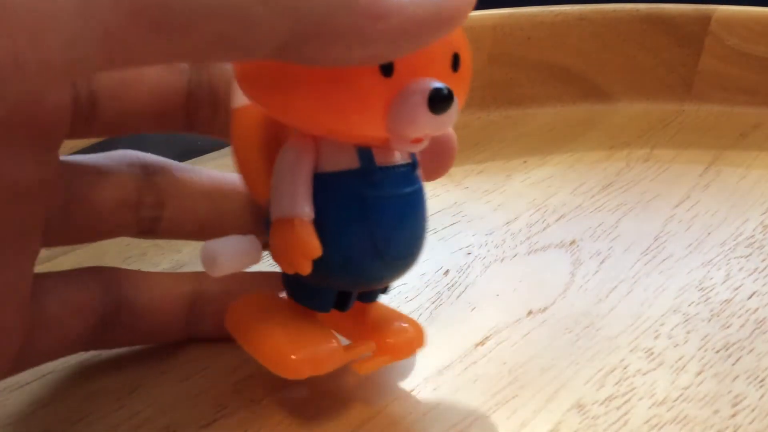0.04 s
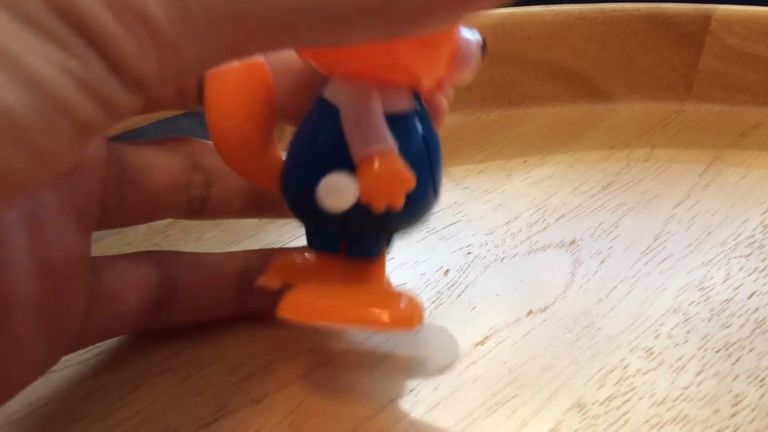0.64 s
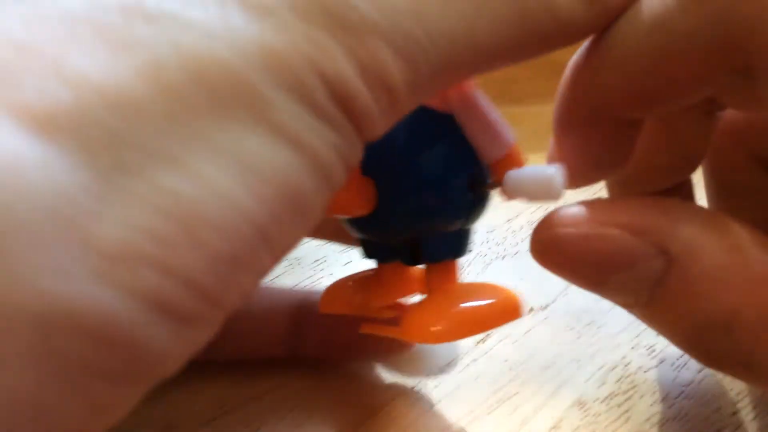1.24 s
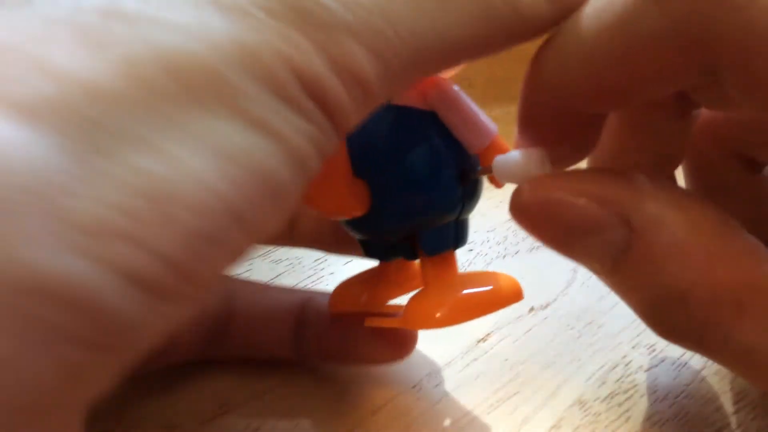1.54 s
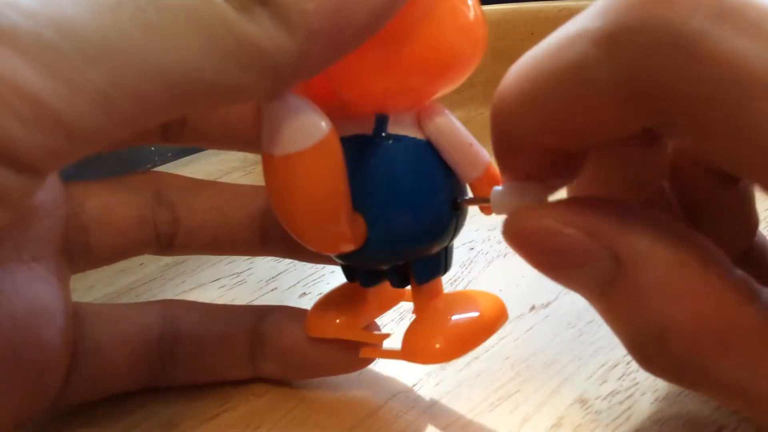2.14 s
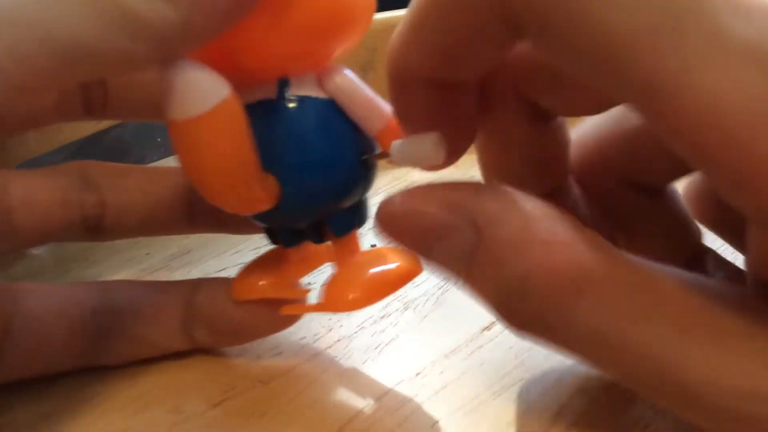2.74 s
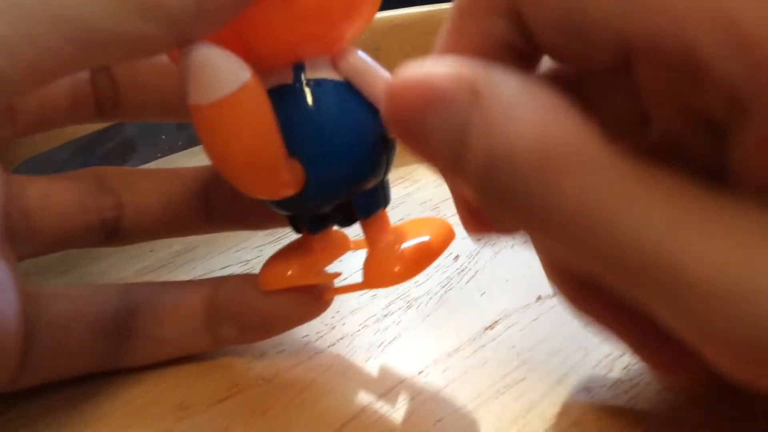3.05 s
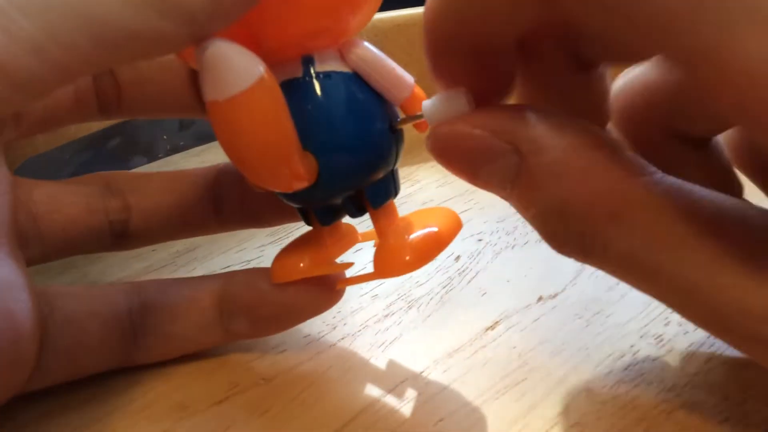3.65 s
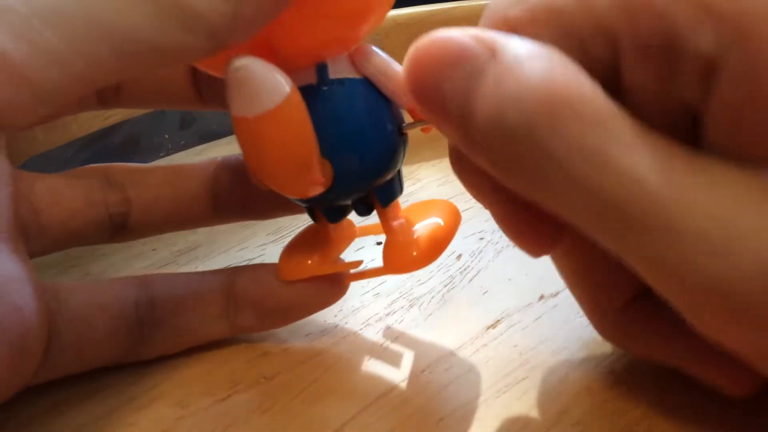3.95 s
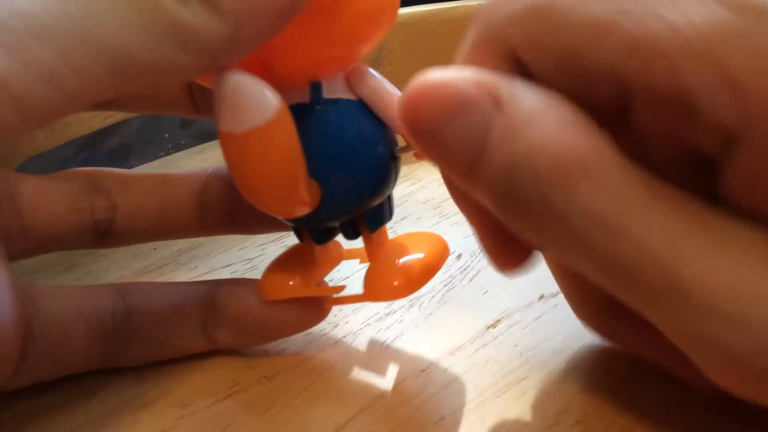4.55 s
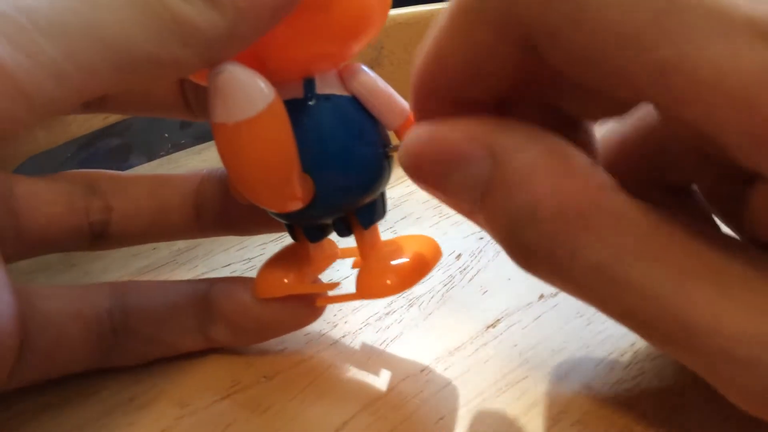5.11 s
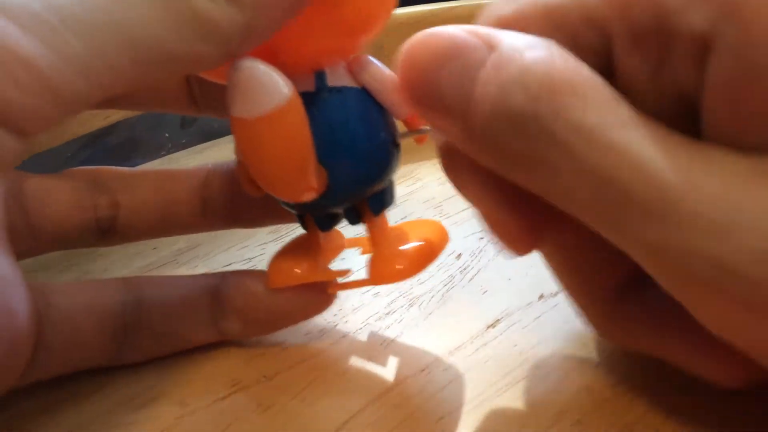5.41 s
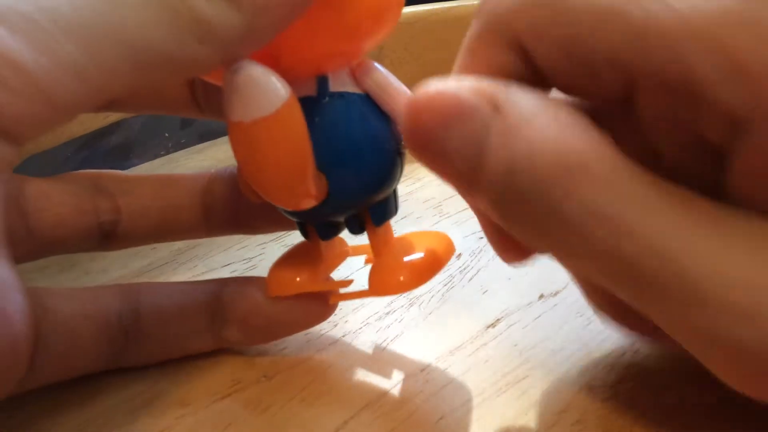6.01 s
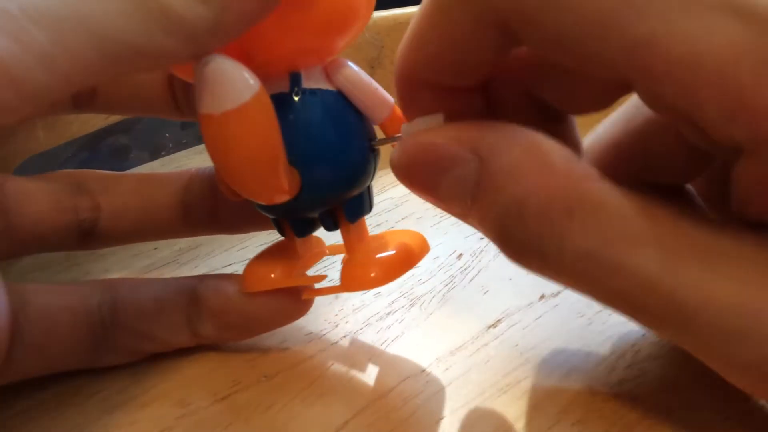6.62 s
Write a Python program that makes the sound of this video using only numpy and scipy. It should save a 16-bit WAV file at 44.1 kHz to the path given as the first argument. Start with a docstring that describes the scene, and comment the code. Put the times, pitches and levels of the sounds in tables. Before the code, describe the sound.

Close rattling whir of a wind-up toy dying away, followed by uneven twists of its clicking key and soft handling bumps.

```python
"""A small plastic clockwork toy whirs close by, over a wooden tray, its escapement rattling the case. A hand
cups it, shifting the colour; the whir runs down in just over a second, then gives two short spurts. From 2.2 s
fingers wind the key in seven uneven twists: a pawl snaps over the ratchet teeth and rings the hollow shell.
Around the twists the hands bump and rub the toy, loose parts tick and the pawl settles. A small, quiet room
answers the clicks."""
import sys
import numpy as np
from scipy import signal
from scipy.fft import rfft, irfft
from scipy.io import wavfile
from scipy.ndimage import uniform_filter1d, map_coordinates

SR = 44100
rng = np.random.default_rng(int(sys.argv[2]) if len(sys.argv) > 2 else 0)


def transcribe(signal):
    """Save signal, clipped to [-1, 1], as a 16-bit WAV file at the path in sys.argv[1]."""
    frames = np.atleast_2d(signal).T
    limited = np.clip(frames, -1, 1)
    pcm = np.round(limited * 32767).astype(np.int16)
    wavfile.write(sys.argv[1], SR, pcm)


N = 302967
TIME = np.arange(N) / SR

# resonances of the hollow shell: f/Hz, width/Hz, level/dB at colour 0 (brighter), level/dB at colour 1
SHELL_MODES = [(864, 590, -25, -26.5), (1400, 230, -24.5, -24.5), (2543, 330, -13.5, -15),
               (3143, 324, -4.5, -8), (3810, 340, -8.5, -9.5), (4430, 600, -16, -15.5),
               (5070, 170, -10.5, -14), (5640, 350, -10.5, -11.5), (6900, 410, -5, 2.5),
               (7430, 150, -2.5, -6.5), (8170, 900, -1, -1.5), (9540, 500, 2, -7), (10500, 150, -4, -10.5),
               (11130, 1100, -4, -14), (13240, 1200, -11, -12), (13850, 290, -15.5, -22.5),
               (16300, 490, -5.5, -20)]
# one curve for each twist of the key: t/s, teeth passed, snap level/dB
KEY_TWISTS = [
    [(2.2387, 0, -27), (2.26, 1, -25), (2.3032, 4, -22), (2.3817, 7, -25), (2.441, 11, -21),
     (2.4746, 13, -20), (2.5027, 14, -20.5), (2.5365, 15, -20.5)],
    [(2.95, 0, -23), (3.0121, 4, -18), (3.0377, 6, -20), (3.0558, 7, -18), (3.0888, 8, -21),
     (3.1192, 9, -23), (3.1473, 11, -18), (3.1769, 13, -18), (3.2294, 16, -21), (3.2564, 17, -24)],
    [(3.8056, 0, -30), (3.8189, 1, -23), (3.874, 7, -23), (3.9139, 9, -22.5), (3.9339, 10, -26),
     (3.9868, 14, -25), (4.005, 15, -24.5), (4.035, 16, -24.5)],
    [(4.4915, 0, -26), (4.5069, 1, -23), (4.5309, 4, -22), (4.6259, 11, -22), (4.678, 13, -18.5),
     (4.7113, 14, -19)],
    [(5.1606, 0, -21), (5.1775, 1, -23), (5.1895, 2, -22), (5.238, 5, -22), (5.251, 6, -24),
     (5.2705, 7, -19.5), (5.3333, 11, -22), (5.3704, 13, -23), (5.3918, 14, -21)],
    [(5.944, 0, -19), (5.9885, 5, -23), (6.0071, 6, -23), (6.066, 8, -21), (6.1341, 10, -23),
     (6.1512, 11, -23), (6.1742, 12, -22), (6.2333, 13, -23.5)],
    [(6.7305, 0, -23), (6.7604, 2, -14), (6.7898, 5, -20), (6.8064, 6, -19), (6.8353, 7, -21)],
]


def amp(db):
    """Decibels to gain."""
    return 10 ** (np.asarray(db) / 20)


def unit(x):
    """Scales to rms 1."""
    return x / np.sqrt(np.mean(x ** 2) + 1e-20)


def envelope(rows):
    """Gain curve through rows of t/s, level/dB; silent outside them."""
    return amp(np.interp(TIME, *np.transpose(rows), left=-np.inf, right=-np.inf))


def at_hz(points, hz):
    """Reads rows of f/Hz, value on a log-frequency axis."""
    f, value = np.transpose(points)
    return np.interp(np.log(hz + 1), np.log(f + 1), value)


def add(mix, s, sound):
    """Lays a sound into the mix at time s."""
    part = mix[max(round(s * SR), 0):][:len(sound)]
    part += sound[:len(part)]


def coloured(x, eq):
    """Shapes x with an EQ curve of f/Hz, level/dB, at rms 1."""
    gain = amp(at_hz(eq, np.fft.rfftfreq(len(x), 1 / SR)))
    return unit(irfft(rfft(x) * gain, len(x)))


def body_ring(modes, blend, tilt_db=0, size=1024):
    """Impulse response of a plastic body, blended between two states; the treble tilts by dB per octave."""
    hz = np.fft.rfftfreq(size, 1 / SR)
    f, width, first_db, second_db = np.transpose(modes)[:, :, None]
    peaks = amp(first_db + blend * (second_db - first_db)) / (1 + ((hz - f) / width) ** 2 * 2)
    gain = np.sqrt((peaks ** 2).sum(0)) * amp(tilt_db * np.log2(np.maximum(hz, 2500) / 8000))
    log_gain = np.log(np.r_[gain, gain[-2:0:-1]] + 1e-5)
    response = np.fft.ifft(np.exp(np.conj(signal.hilbert(log_gain)))).real  # minimum phase
    return response / np.linalg.norm(response)


def contact(t, rise_s, fall_s):
    """Envelope of a rattling contact: it swells and dies within a few milliseconds."""
    attack = np.sin(np.pi / 2 * np.minimum(t / rise_s, 1)) ** 2
    return attack * np.exp(-np.maximum(t - rise_s, 0) / fall_s)


def room_tone(level_db=-72):
    """The quiet room: a low murmur under faint hiss."""
    # spectrum of the room's air: f/Hz, level/dB
    air_eq = [(20, -17.5), (45, -12.5), (80, 3.5), (150, -0.5), (200, -1.5), (270, -8.5), (350, -18),
              (480, -9.5), (800, -18), (1600, -17), (5000, -17), (9000, -14.5), (12000, -23.5),
              (15000, -46.5)]
    return amp(level_db) * coloured(rng.standard_normal(N), air_eq)


def room_reverb(x, wet_db=-17, build_s=0.0025):
    """Adds a diffuse tail that swells after the direct sound and dies sooner in the treble."""
    # decay of the room: f/Hz, t60/s
    decay = [(300, 0.24), (1500, 0.75), (4000, 0.29), (8000, 0.25), (15000, 0.19)]
    hz, t, noise = signal.stft(rng.standard_normal(SR // 2), SR, nperseg=256)
    colour_db = at_hz([(1000, 0.00084), (2800, -5), (5000, 0.0061)], hz)[:, None]
    fade_db = 60 * t / at_hz(decay, hz)[:, None]
    tail = signal.istft(noise * amp(colour_db - fade_db), SR, nperseg=256)[1]
    tail *= 1 - np.exp(-(np.arange(len(tail)) / SR / build_s) ** 2)
    return x + amp(wet_db) * signal.oaconvolve(x, tail / np.linalg.norm(tail))[:N]


def skin_rub(grains_per_s=900, clump_db=4.5, hold_db=-74, turn_db=-63.5, trim_db=-2):
    """Skin sticks and slips in clumps of grains: faint while holding, more on twists and shifts of grip."""
    # fingers slide to a new grip: centre t/s, length/s, level/dB
    slides = [(1.056, 0.45, -64.5), (1.43, 0.33, -63), (2.397, 0.4, -54.5), (2.79, .14, -57.5),
              (3.08, 0.21, -51.5), (3.52, 0.32, -62.5), (4.556, 0.4, -63), (5.122, 0.3, -62),
              (5.818, 0.29, -59.5), (6.55, 0.44, -67)]
    rub_eq = [(30, -11), (90, -6.5), (200, -8.5), (265, -31.5), (335, 3.5), (450, -9.5), (620, -6.5),
              (790, 1.5), (1000, -13.5), (1450, -16.5), (2100, -22.0), (15000, -61.5)]
    grip = unit(uniform_filter1d(rng.standard_normal(N), size=1300))
    grains = (rng.random(N) < grains_per_s / SR) * rng.standard_normal(N)
    rub = coloured(grains * amp(clump_db * np.clip(grip, -2, 2)), rub_eq)
    turning = sum(envelope([(twist[0][0], turn_db), (twist[-1][0], turn_db)]) for twist in KEY_TWISTS)
    sliding = sum(amp(db) * np.cos(np.pi * np.clip((TIME - s) / length, -.5, .5))
                  for s, length, db in slides)
    return rub * np.sqrt(amp(hold_db) ** 2 + turning ** 2 + sliding ** 2) * amp(trim_db)


def fidgets(db, count, spread_db=1.5):
    """Small chance movements of the hands from the first twist on: rows of t/s, level/dB."""
    when, force = rng.random((count, 2)).T
    start = KEY_TWISTS[0][0][0]
    times = start + (np.arange(count) + when) / count * (N / SR - start)
    return list(zip(times, db + spread_db * (2 * force - 1)))


def hand_thuds(swell_s=0.012):
    """The flesh of the hand gives dull thuds, short swells of low noise."""
    # soft pushes of the hands: t/s, level/dB
    pushes = [(.855, -61), (3.293, -62.5), (3.94, -56), (4.839, -65), (5.583, -51.5), (5.95, -62),
              (6.41, -58), (6.755, -59)]
    thud_eq = [(25, -18.5), (80, -6.0), (140, -2.5), (200, -5.5), (300, -24), (900, -32.5)]
    pressure, t = np.zeros(N), np.arange(SR // 5) / SR
    for s, db in list(pushes) + fidgets(db=-62.5, count=18):
        add(pressure, s, amp(db) * t / swell_s * np.exp(1 - t / swell_s))
    return pressure * coloured(rng.standard_normal(N), thud_eq)


def hand_bumps(rise_s=0.0003, hard_db=-28, dulling=.3, low_cut_hz=230):
    """Soft blows ring the low modes, the softer the duller; so small a body radiates little bass."""
    # the hands bump toy and tray: t/s, level/dB
    blows = [(.967, -48), (1.114, -41.5), (1.135, -36), (1.202, -42), (2.61, -44.5), (2.859, -46.5),
             (2.888, -43.5), (3.048, -39), (3.122, -41.5), (3.475, -49.5), (3.584, -45.5), (3.947, -29.5),
             (4.201, -42.5), (4.7819, -29.5), (4.916, -38.5), (5.675, -41), (6.481, -42.5)]
    # modes rung by a bump: f/Hz, level/dB, t60/s
    knock_modes = [(333, -3, 0.072), (480, -6.5, 0.0073), (620, -19, 0.0022), (710, 2, 0.014),
                   (1480, -13, 0.016)]
    out, t = np.zeros(N), np.arange(SR // 5) / SR
    hz, mode_db, t60 = np.transpose(knock_modes)[:, :, None]
    sign = (-1) ** np.arange(len(hz))[:, None]  # neighbouring modes swing in opposite directions
    for s, db in list(blows) + fidgets(db=-55.5, count=12):
        detune, spot = rng.standard_normal((2, len(hz), 1))
        dull_db = dulling * (db - hard_db) * (hz / 1000) ** 2
        fade = amp(mode_db + dull_db + 1.5 * spot - 60 * t / t60)
        modes = sign * fade * np.sin(2 * np.pi * hz * (1 + .015 * detune) * t)
        add(out, s, amp(db) * modes.sum(0) * (1 - np.exp(-t / rise_s)))
    return signal.sosfilt(signal.butter(2, low_cut_hz, "high", fs=SR, output="sos"), out)


def shell_ticks(slack_lead_s=.023, slack_db=-46, slack_decay_s=0.0068):
    """Small ticks ring the shell: loose parts shift, the pawl settles shortly after a twist, and the key takes
    up its slack before each twist."""
    # small ticks in the shell, from loose parts and the pawl settling after a twist: t/s, level/dB, decay/s
    small_ticks = [(1.562, -57, 0.0061), (1.832, -62, 0.027), (1.982, -60, 0.011), (2.645, -34.5, 0.0055),
                   (2.781, -43.5, 0.0027), (2.833, -43.5, 0.0021), (2.909, -53.5, .003),
                   (3.296, -41, 0.0096), (3.368, -47.5, 0.011), (4.356, -50, .003), (4.779, -45, 0.0033),
                   (4.845, -47, 0.0061), (5.055, -43.5, 0.002), (5.498, -27, 0.0018), (6.424, -60.5, 0.014)]
    key_ticks = [(twist[0][0] - slack_lead_s, slack_db, slack_decay_s) for twist in KEY_TWISTS]
    scrapes, t = np.zeros(N), np.arange(SR // 10) / SR
    for s, db, decay_s in list(small_ticks) + key_ticks:
        add(scrapes, s, amp(db) * np.exp(-t / decay_s) * rng.standard_normal(len(t)))
    return signal.oaconvolve(scrapes, body_ring(SHELL_MODES, 0.24, tilt_db=-4.5))[:N]


def palm_comb(whir, above_hz=5500):
    """The nearing palm reflects the treble and sweeps a comb of notches upward."""
    # echo from the palm as it closes round the toy: t/s, delay/s, strength 0-1
    reflection = [(.4, .00031, 0.05), (.55, .0003, .25), (.75, 0.000278, .45), (1.0, 0.000251, .4),
                  (1.12, 0.00024, 0)]
    s, *columns = np.transpose(reflection)
    delay, strength = (np.interp(TIME, s, column) for column in columns)
    treble = signal.sosfiltfilt(signal.butter(2, above_hz, "high", fs=SR, output="sos"), whir)
    echo = map_coordinates(treble, [(TIME - delay) * SR], order=3)
    return (whir + strength * echo) / np.hypot(1, strength)


def escapement(drive, beats_per_s=345, at_db=-36, halving_db=14, jitter_s=.0002, uneven_db=3.2, limp_db=-3):
    """The anchor's two pallets hit the teeth in turn, one harder; the beat slows as the drive fades."""
    rate = beats_per_s * 2 ** ((20 * np.log10(drive + 1e-9) - at_db) / halving_db)
    beats = np.flatnonzero(np.diff(np.floor(np.cumsum(rate) / SR)))
    slip, force = rng.standard_normal((len(beats), 2)).T
    hits = np.clip(beats + (jitter_s * SR * slip).astype(int), 0, N - 1)
    pallet = np.arange(len(beats)) % 2
    blows = np.zeros(N)
    blows[hits] = amp(uneven_db * np.minimum(force, 2) + limp_db * pallet)
    burst = contact(np.arange(SR // 100) / SR, rise_s=.0005, fall_s=.00065)
    rattle = signal.oaconvolve(blows, burst)[:N] * rng.standard_normal(N)
    # the spring delivers a steady power, however it is shared among the blows
    return rattle / np.sqrt(uniform_filter1d(rattle ** 2, size=3200) + 1e-9)


def clockwork_whir(mesh_db=-5, rattle_tilt_db=5, mesh_tilt_db=-3, cup_start_s=0.54, cup_length_s=0.19):
    """Bright escapement rattle and the duller hiss of sliding gear teeth ring the case as a hand cups it."""
    # force of the gears, one curve for each time the key runs free: t/s, level/dB
    free_runs = [
        [(0, -33), (.12, -33.5), (.26, -37), (.56, -35), (.72, -40.5), (.8, -41), (.88, -37.5), (1.16, -44),
         (1.2, -57), (1.26, -82)],
        [(1.305, -69), (1.318, -41.5), (1.47, -46.5), (1.52, -69.5)],
        [(2.14, -88), (2.168, -41.5), (2.185, -38.5), (2.22, -50.5), (2.25, -55)],
    ]
    # case resonances rung by the gears: f/Hz, width/Hz, level/dB held loosely, level/dB cupped
    case_modes = [(890, 650, -24.5, -19.5), (2170, 230, -59, -16.5), (2527, 450, -21, -15.5),
                  (3340, 520, -10.5, -8), (4000, 700, -16, -23.5), (4900, 1400, -15.5, -15),
                  (6290, 310, -8.5, -5), (7580, 880, -3, -4.5), (8200, 450, -13.5, -2.5),
                  (9250, 660, -2.5, -0.5), (10590, 620, 2, 0.5), (11900, 1100, 0, -5.5),
                  (12610, 900, -33, -11.5), (14800, 1300, -20, -28.5)]
    drive = sum(envelope(run) for run in free_runs)
    rattle = escapement(drive)
    mesh = amp(mesh_db) * rng.standard_normal(N)
    gain = drive / np.hypot(1, amp(mesh_db))
    cupping = np.clip((TIME - cup_start_s) / cup_length_s, 0, 1)
    whir = np.zeros(N)
    for layer, tilt_db in ((rattle, rattle_tilt_db), (mesh, mesh_tilt_db)):
        loose, cupped = (signal.oaconvolve(gain * layer, body_ring(case_modes, state, tilt_db))[:N]
                         for state in (0, 1))
        whir += (1 - cupping) * loose + cupping * cupped
    return whir


def pawl_snap(colour, tilt_db, rise_s=0.0012, fall_s=0.0019, bounce_s=0.0013, bounce_gain=0.2, spot_db=2):
    """The pawl strikes, bounces once and rings the shell, whose colour shifts with grip and key angle."""
    t = np.arange(500) / SR
    after_bounce = np.maximum(t - bounce_s * (.5 + rng.random()), 0)
    chatter = contact(t, rise_s, fall_s) + bounce_gain * contact(after_bounce, rise_s / 2, fall_s / 2)
    # every tooth is met at another spot, which favours other resonances
    modes = np.array(SHELL_MODES, float)
    modes[:, 2:] += spot_db * rng.standard_normal((len(modes), 1))
    snap = signal.fftconvolve(chatter * rng.standard_normal(len(t)), body_ring(modes, colour, tilt_db))
    return snap / np.linalg.norm(snap) * np.sqrt(0.0054 * SR)  # the energy of 5.4 ms at rms 1


def teeth(twist):
    """Times and levels at which the turning key lets each tooth slip under the pawl."""
    s, passed, db = np.transpose(twist)
    tooth = np.arange(passed[-1] + 1)
    return zip(np.interp(tooth, passed, s), np.interp(tooth, passed, db))


def ratchet(uneven_db=1.46, usual_db=-23, tilt_per_db=0.48, scatter_db=1.03, lead_s=.0003, trim_db=0.04):
    """The key winds the spring with one snap of the pawl per tooth, brighter when harder."""
    # each twist: shell colour 0-1 at its start, at its end, treble tilt/dB per octave
    twist_colours = [(0, 0.152, .3), (0, .75, .4), (0.301, 0.2, 1.5), (.5, .7, 1), (.75, .7, 1.33),
                     (.9, 0.7, 0.5), (1, .95, 0.5)]
    out = np.zeros(N)
    for twist, (colour_from, colour_to, grip_tilt_db) in zip(KEY_TWISTS, twist_colours):
        for s, db in teeth(twist):
            force, slant = np.clip(rng.standard_normal(2), -2, 2)
            db += uneven_db * force
            tilt_db = grip_tilt_db + tilt_per_db * (db - usual_db) + scatter_db * slant
            colour = np.interp(s, [twist[0][0], twist[-1][0]], [colour_from, colour_to])
            add(out, s - lead_s, amp(db + trim_db) * pawl_snap(colour, tilt_db))
    return out


def scene():
    """Toy and hands in a quiet room, in mono."""
    toy = palm_comb(clockwork_whir()) + ratchet() + shell_ticks()
    handling = hand_bumps() + skin_rub() + hand_thuds()
    return (room_reverb(toy + handling) + room_tone())[None]


def record(dry):
    """A steep low-pass trims the very top of the treble."""
    edge_hz = 15950
    low_pass = signal.firwin(255, edge_hz, window=("kaiser", 9), fs=SR)
    return signal.oaconvolve(dry, low_pass[None], "same")


dry = scene()
out = record(dry)
transcribe(out)
```